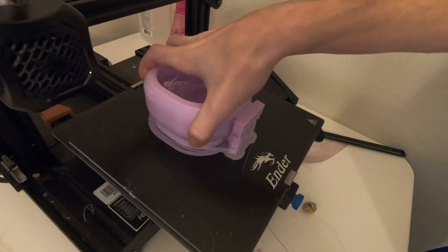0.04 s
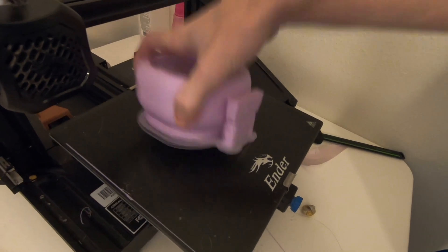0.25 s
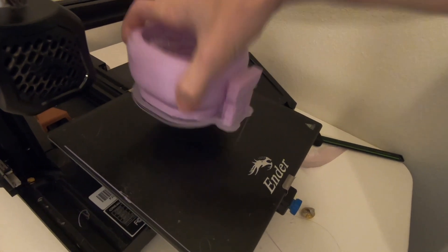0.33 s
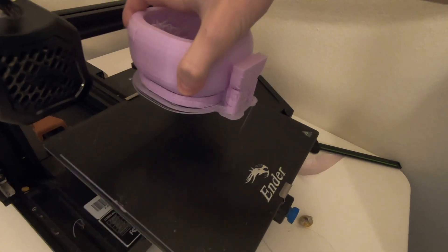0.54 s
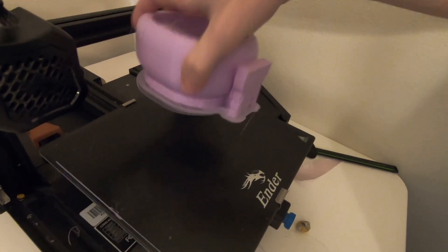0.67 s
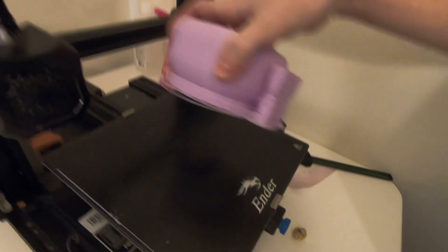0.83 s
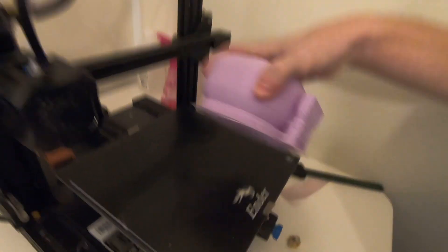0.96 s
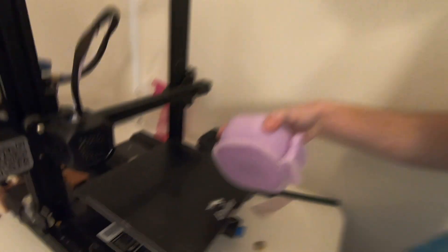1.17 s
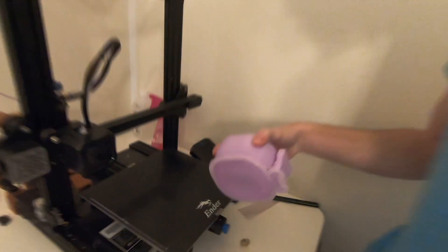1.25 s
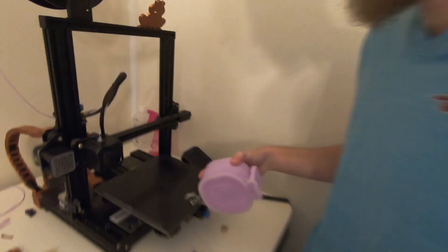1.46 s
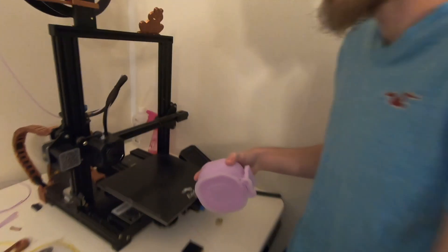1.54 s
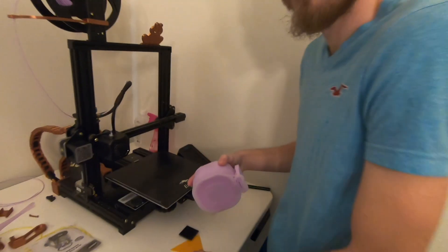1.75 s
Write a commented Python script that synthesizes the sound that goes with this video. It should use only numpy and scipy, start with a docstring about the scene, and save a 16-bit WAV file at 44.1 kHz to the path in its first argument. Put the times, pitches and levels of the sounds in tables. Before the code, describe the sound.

A hollow plastic print cracks loudly off a metal printer bed, then small handling clicks follow

```python
"""First come the quiet air and low drone of a small room, a faint rub and a tiny tick. Then a hollow plastic
print is pried off a printer bed: a faint swell of noise leads into one loud tearing crack that rings the bed
plate. The print is lifted and turned in the hand, with rubs, ticks, a faint squeak and a last sharp click, while
the hand-held microphone rumbles. Crack, rubs and rumble are shaped noise; plate, frame and squeak are sine waves;
ticks mix a noise snap with a ringing sine. Filtered noise that dies away adds the room's answer."""
import sys
import numpy as np
from scipy import signal
from scipy.fft import rfft, irfft, next_fast_len
from scipy.io import wavfile
from scipy.ndimage import map_coordinates

SR = 44100
rng = np.random.default_rng(int(sys.argv[2]) if len(sys.argv) > 2 else 0)


def transcribe(signal):
    """Save signal, clipped to [-1, 1], as a 16-bit WAV file at the path in sys.argv[1]."""
    frames = np.atleast_2d(signal).T
    limited = np.clip(frames, -1, 1)
    pcm = np.round(limited * 32767).astype(np.int16)
    wavfile.write(sys.argv[1], SR, pcm)


N = 79380  # samples
T = np.arange(N) / SR  # time of each sample [s]

# Steady air of the room, and its low drone: (frequency [Hz], relative level [dB])
AIR_COLOUR = [(120, -28.5), (200, -1.5), (456, -20), (735, -11), (1040, -21), (1270, -21.5), (3370, -30.5),
              (5840, -29), (9580, -34.5), (16000, -50)]
DRONE_COLOUR = [(25, -3), (60, -0.5), (85, -12.5), (120, 1.5), (165, -1.5), (230, -12.5), (400, -25.5),
                (1200, -80)]
AIR_DB, DRONE_DB = -74, -68

# How long the room answers: (frequency [Hz], time to fall by 60 dB [s])
ROOM_DECAY = [(150, .3), (400, 0.3), (1000, 0.34), (1700, 0.42), (2900, .41), (5500, 0.46), (8000, 0.4),
              (12000, 0.22), (16000, .22)]
# Tone of the room's answer: (frequency [Hz], level [dB])
ROOM_COLOUR = [(100, -0.5), (260, 8.5), (600, -5.5), (1000, -6), (1700, 0), (3000, -3), (7000, -10),
               (10000, -5.5), (16000, -6.5)]
ROOM_DELAY_S, ROOM_ALIKE = .004, .2  # ALIKE: likeness of left and right, from 0 to 1
EARLY_DB, EARLY_T60_S = -2, .027  # the short answer of near surfaces
ROOM_MONO_HZ = 700  # well below this, left and right hear the same room

# Deep handling rumble, before its overall gain: (time [s], level [dB])
RUMBLE_LEVEL = [(0.0, -78), (0.204, -76), (0.25, -53), (0.31, -45.5), (0.436, -95.5), (0.536, -63),
                (0.776, -62.5), (0.892, -43), (1.016, -42), (1.052, -54.5), (1.112, -43), (1.162, -60),
                (1.318, -45.5), (1.362, -57), (1.558, -54), (1.658, -74), (1.724, -54.5), (1.8, -69)]
# Low shuffling, before its overall gain: (time [s], level [dB])
SHUFFLE_LEVEL = [(0.0, -63.5), (0.184, -89), (0.22, -46.5), (0.254, -52), (0.41, -75), (0.772, -68),
                 (0.806, -57.5), (0.846, -68), (0.872, -53), (1.076, -69), (1.128, -55.5), (1.252, -51.5),
                 (1.272, -64), (1.554, -63.5), (1.654, -58.5), (1.8, -72.5)]
# Hand bumps on the microphone, before the bump strength: (time [s], level [dB])
BUMPS = [(.872, -43.5), (0.931, -46.5), (1.095, -50.5), (1.296, -51), (1.49, -54.5)]
# Tones of the three: (frequency [Hz], relative level [dB])
RUMBLE_COLOUR = [(15, -7.5), (30, 1.5), (60, -7), (95, -22), (160, -32.5), (500, -91)]
SHUFFLE_COLOUR = [(50, -29), (105, -19), (160, 4.5), (205, -0.5), (290, -10.5), (420, -19), (900, -43),
                  (2500, -78.5)]
BUMP_COLOUR = [(25, 16), (90, 13), (250, -3), (700, -40), (2000, -63)]
RUMBLE_GAIN_DB, SHUFFLE_GAIN_DB, RUMBLE_PAN_DB = 1, -1, -4.5  # PAN: left minus right
BUMP_STRENGTH = np.sqrt(.019 * SR)  # a one-sample click made as strong as 19 ms of noise

# Thin wavering tone: (time [s], frequency [Hz], level [dB])
SQUEAK = [(.62, 6600, -101), (.655, 6950, -78), (.69, 7050, -98), (.735, 6650, -78), (.775, 6595, -90),
          (.82, 6720, -87), (.86, 6780, -109)]

# Rubs of plastic: (time [s], level [dB], length [s], time to fall by 60 dB [s],
#                   centre [Hz], distance from the centre to the -6 dB point [octaves])
RUBS = [(0, -68, .03, .2, 5100, 0.56), (1.2496, -56.5, 0.0065, 0.16, 3056, 2.1),
        (1.28, -50, 0.013, 0.28, 1900, 0.66), (1.294, -58.5, 0.02, 0.38, 1070, 0.51),
        (1.558, -53.5, 0.023, 0.2, 1220, 0.58), (1.44, -71, 0.15, 0.19, 3050, 1.13)]
# Resonances of the hollow print, before halving: (frequency [Hz], width [Hz], level [dB])
SHELL = [(1320, 30, 16.5), (1780, 40, 12), (2041, 70, 12.5), (2890, 80, 9.5), (5700, 460, 0)]
RUB_GRAIN_DB, RUB_ROOM_DB = -6, -4
RUB_SKIRT_DB, RUB_TOP_HZ = -18.5, 8200  # SKIRT: level far from the centre of the band

# Ticks of handled plastic: (time [s], level [dB], left minus right [dB], ring frequency [Hz],
#     ring level before doubling [dB], ring time to fall by 60 dB [s], tilt [dB per octave], room level [dB])
TICKS = [(0.048, -58.5, 13, 3200, -8.5, 0.015, 9, -6.5), (0.547, -50, 1.5, 2200, -8, 0.062, -0.5, -7),
         (0.743, -64, 0, 1780, 0, 0.013, -7.5, -4), (1.085, -62.5, -1, 1300, -15, .012, -3, 5),
         (1.4445, -45, -1.5, 2600, 12, 0.0063, -4.5, -0.5), (1.4674, -44.5, -1, 3055, 2, 0.013, -1, -2),
         (1.6109, -24, -4.5, 2740, -15, 0.014, 1.5, -1.5)]
# Tone of a tick before its tilt: (frequency [Hz], relative level [dB])
TICK_COLOUR = [(120, -32), (200, -9), (1000, -7), (2000, -2), (2900, -2), (4400, -9), (6000, -1.5),
               (7400, 1.5), (10000, -7.5), (13600, -19.5), (15500, -25)]
TICK_HOLD_S, TICK_T60_S, TICK_ALIKE = .0014, .0042, .13
TICK_ROOM_TILT_DB = -1.25  # per octave: less of the treble reaches the walls

# Ringing modes of the bed plate: (frequency [Hz], level [dB], time to fall by 60 dB [s])
PLATE = [(395, -34.5, .29), (553, -49, 0.23), (959, -36, .27), (1470, -40.5, .35), (1826, -40, 0.54),
         (2303, -27.5, 0.3), (2291, -36, .35), (2614, -32, .3), (2944, -45, 0.14), (3200, -39.5, 0.56),
         (3350, -35.5, .27), (5104, -37, .33), (6233, -40.5, .33), (8310, -37, 0.38)]
# Slow modes of the frame under it: (frequency [Hz], level [dB], time to fall by 60 dB [s])
FRAME = [(52, -43, .45), (142.2, -31.5, 0.2), (226.2, -33, 0.26), (272, -41, .3)]
# The plate's many weaker modes: (frequency [Hz], typical level of each [dB])
SHIMMER = [(750, -59), (1500, -57.5), (2500, -49.5), (4000, -50), (6500, -48), (9000, -51), (12000, -56.5),
           (15000, -67)]
RELEASE_S = .219  # the bed springs free
PLATE_RISE_S, FRAME_RISE_S, FRAME_LAG_S = .0088, .014, .0065  # RISE: time constant of the build-up
SHIMMER_T60_S, SHIMMER_FALL = .55, .15  # time to fall by 60 dB at 3 kHz; how much it shortens with pitch
SHIMMER_SCATTER_DB, SHIMMER_PAN_DB = 1, 3

# Swell and tearing bursts of the crack: (time [s], starting level [dB], hold time [s],
#     growth during the hold [dB], time to fall by 60 dB [s], treble tilt [dB per octave])
CRACKS = [(0.1958, -55.5, .009, 6, .02, -0.5), (.208, -41.5, .010, 4.5, .012, -1),
          (0.2187, -15.5, .0012, 1.5, 0.0073, 3), (0.2189, -17.5, .0135, 0, .018, 0),
          (0.264, -31.5, 0.0071, 2, .015, -3)]
# Tone of these bursts before their tilt: (frequency [Hz], relative level [dB])
CRACK_COLOUR = [(180, -55), (300, -12), (562, -31), (922, -6), (1540, -14.5), (2560, -1), (3230, -2),
                (3630, -6.5), (4490, -7), (4800, -12.5), (5210, -2.5), (7620, -11.5), (8560, -8.5),
                (12300, -27.5), (15500, -46.5)]
# Sideways lean of these bursts: (frequency [Hz], left minus right [dB])
CRACK_BALANCE = [(300, 1.5), (600, -0.5), (1000, 6), (2000, 4), (2800, 1), (4500, 9.5), (8000, 8.5),
                 (13000, 16)]
CRACK_ALIKE, CRACK_ROOM_DB = .45, -1.5

LIMIT, TOP_HZ = .55, 16300  # highest peak (full scale is 1) and band limit of the recorder


def amp(db):
    """Turn decibels into gain."""
    return 10 ** (np.asarray(db) / 20)


def unit(x):
    """Scale to an rms (average strength) of 1."""
    return x / np.sqrt(np.mean(x ** 2) + 1e-20)


def along(points, hz):
    """Read a curve of (frequency, value) points on a log frequency axis."""
    f, v = np.transpose(points)
    return np.interp(np.log(hz + 1), np.log(f + 1), v)


def curves(rows):
    """Draw straight lines through each column after the time, one value per sample."""
    s, *columns = np.transpose(rows)
    return [np.interp(T, s, column) for column in columns]


def pan(db):
    """Left and right gains for a level difference, left minus right."""
    return amp(np.array([[db], [-db]]) / 2)


def noise(alike):
    """Two white noises, left and right, with the given correlation."""
    a, b = rng.standard_normal((2, N))
    angle = np.arccos(np.clip(alike, -1, 1)) / 2
    shared, apart = np.cos(angle) * a, np.sin(angle) * b
    return np.array([shared + apart, shared - apart])


def impulse(s):
    """One ideal click, a single sample long."""
    return signal.unit_impulse(N, int(np.clip(s * SR, 0, N - 1)))


def colour(x, points, tilt_db=0):
    """Filter with no sound before its cause; the tilt acts above 700 Hz, and white noise keeps its power."""
    m = 2 * next_fast_len(N)
    hz = np.fft.rfftfreq(m, 1 / SR)
    gain = unit(amp(along(points, hz) + tilt_db * np.log2(np.maximum(hz, 700))))
    # folding the cepstrum (spectrum of the log gain) puts the response after time zero
    cepstrum = irfft(np.log(gain + 1e-6))
    cepstrum[1:m // 2] *= 2
    cepstrum[m // 2 + 1:] = 0
    return irfft(rfft(x, m) * np.exp(rfft(cepstrum)))[..., :N]


def burst(s, hold_s, t60):
    """Loudness shape: sudden start, hold, then a fall by 60 dB in each t60."""
    return (T >= s) * amp(-60 * np.maximum(T - s - hold_s, 0) / t60)


def grain(depth_db, rate):
    """Smooth random gain of rms 1, with a new random value rate times a second."""
    wander = map_coordinates(rng.standard_normal(N), [T * rate])
    return unit(amp(depth_db * wander))


def ring(s, hz, t60, rise_s):
    """One struck mode: a fading sine, a little out of phase between left and right."""
    t = np.maximum(T - s, 0)
    phase = rng.uniform(0, 2 * np.pi) + rng.normal(0, .25, (2, 1))
    return np.sin(2 * np.pi * hz * t + phase) * burst(s, 0, t60) * (1 - np.exp(-t / rise_s))


def air():
    """The quiet air and low drone of the room are two steady filtered noises."""
    quiet_air = amp(AIR_DB) * colour(noise(.5), AIR_COLOUR)
    drone = amp(DRONE_DB) * colour(noise(.8), DRONE_COLOUR)
    return quiet_air + drone


def fade(t, t60):
    """Falling power whose sum over time is 1; 60 dB takes t60."""
    power = amp(-120 * t / t60)
    return power / power.sum(-1, keepdims=True)


def room(x):
    """The diffuse answer to a sound: near surfaces die quickly, the room more slowly, as smeared noise."""
    hz, t, z = signal.stft(x, SR, nperseg=128)
    power = np.mean(np.abs(z) ** 2, axis=0)
    answer = fade(t, along(ROOM_DECAY, hz)[:, None]) + amp(EARLY_DB) ** 2 * fade(t, EARLY_T60_S)
    level = np.sqrt(np.abs(signal.fftconvolve(power, answer, axes=1)[:, :len(t)]))
    haze = signal.stft(noise(ROOM_ALIKE), SR, nperseg=128)[2]
    haze /= np.sqrt(np.mean(np.abs(haze) ** 2))
    haze = haze * level * amp(along(ROOM_COLOUR, hz))[:, None]
    tail = signal.istft(haze, SR, nperseg=128)[1]
    # take away the left-right difference in the bass
    low_pass = signal.butter(1, ROOM_MONO_HZ, fs=SR, output="sos")
    bass_side = signal.sosfilt(low_pass, tail[0] - tail[1]) / 2
    tail = tail - [bass_side, -bass_side]
    return np.pad(tail, ((0, 0), (int(ROOM_DELAY_S * SR), 0)))[:, :N]


def handling():
    """The moving microphone rumbles and is bumped; low shuffling noise goes with the movement."""
    rumble_gain = amp(curves(RUMBLE_LEVEL)[0] + RUMBLE_GAIN_DB)
    rumble = rumble_gain * unit(colour(noise(.2), RUMBLE_COLOUR))
    shuffle_gain = amp(curves(SHUFFLE_LEVEL)[0] + SHUFFLE_GAIN_DB)
    shuffle = shuffle_gain * unit(colour(noise(.23), SHUFFLE_COLOUR))
    knocks = sum(amp(db) * impulse(s) for s, db in BUMPS)
    bumps = BUMP_STRENGTH * colour(knocks, BUMP_COLOUR)
    return (rumble + bumps) * pan(RUMBLE_PAN_DB) + shuffle


def squeak():
    """A faint thin tone wavers in pitch and level as the print is lifted."""
    hz, db = curves(SQUEAK)
    sounding = (T > SQUEAK[0][0]) & (T < SQUEAK[-1][0])
    tone = np.sin(2 * np.pi * np.cumsum(hz) / SR)
    return sounding * amp(db) * grain(2, rate=69) * tone


def rubs():
    """Brief grainy slides, each a broad band of noise, ring the hollow print."""
    out = np.zeros((2, N))
    hz = np.geomspace(50, 18000, 900)
    shell = 1 + sum(amp(db) / (1 + (2 * (hz - f) / width) ** 2) for f, width, db in SHELL) / 2
    treble_cut = 1 + (hz / RUB_TOP_HZ) ** 6
    for s, db, length, t60, centre, width in RUBS:
        octaves = np.log2(hz / centre)
        band = (amp(-6 * (octaves / width) ** 2) + amp(RUB_SKIRT_DB)) / treble_cut
        slips = burst(s, length, t60) * noise(.2) * grain(RUB_GRAIN_DB, rate=1200)
        tone = np.column_stack([hz, 20 * np.log10(band * shell)])
        out += amp(db) * colour(slips, tone)
    return out + amp(RUB_ROOM_DB) * room(out)


def ticks():
    """Short plastic contacts: a snap and one damped resonance; the room answers each as a single click."""
    out = np.zeros((2, N))
    for s, db, pan_db, hz, ring_db, t60, tilt, room_db in TICKS:
        contact = burst(s, TICK_HOLD_S, TICK_T60_S)
        snap = colour(contact * noise(TICK_ALIKE), TICK_COLOUR, tilt)
        body = 2 * amp(ring_db) * ring(s, hz, t60, rise_s=.0003)
        # one click with the energy of the whole contact
        click = colour(np.linalg.norm(contact) * impulse(s), TICK_COLOUR, tilt + TICK_ROOM_TILT_DB)
        echo = amp(room_db) * room(click + body / 2)
        out += amp(db) * ((snap + body) * pan(pan_db) + echo)
    return out


def shimmer(count=220):
    """A dense cloud of weaker plate modes; the higher ones die sooner."""
    t = T[:int(.8 * SR)]
    cloud = np.zeros((2, len(t)))
    lowest, highest = SHIMMER[0][0], SHIMMER[-1][0]
    for size, turn, lag in rng.standard_normal((count, 3)):
        hz = lowest + (highest - lowest) * rng.uniform() ** 1.4  # more modes low down
        t60 = SHIMMER_T60_S * (3000 / hz) ** SHIMMER_FALL
        gain = amp(along(SHIMMER, hz) + SHIMMER_SCATTER_DB * size)
        phase = np.pi * turn + np.array([[lag], [-lag]]) * hz / 8000
        cloud += gain * amp(-60 * t / t60) * np.sin(2 * np.pi * hz * t + phase)
    cloud *= 1 - np.exp(-t / PLATE_RISE_S)
    start = int(RELEASE_S * SR)
    return np.pad(cloud, ((0, 0), (start, N)))[:, :N] * pan(SHIMMER_PAN_DB)


def bed():
    """The freed plate starts to ring at once; the heavy frame swings up later and more slowly."""
    plate = sum(amp(db) * ring(RELEASE_S, hz, t60, PLATE_RISE_S) for hz, db, t60 in PLATE)
    frame_start = RELEASE_S + FRAME_LAG_S
    frame = sum(amp(db) * ring(frame_start, hz, t60, FRAME_RISE_S) for hz, db, t60 in FRAME)
    return plate + shimmer() + frame


def cracks():
    """A swell and tearing bursts of noise make up the crack; its treble leans to the left."""
    bursts = np.zeros((2, N))
    for s, db, hold, growth_db, t60, tilt in CRACKS:
        growth = growth_db * np.clip((T - s) / hold, 0, 1)
        strength = amp(db + growth) * burst(s, hold, t60)
        bursts += colour(strength * noise(CRACK_ALIKE), CRACK_COLOUR, tilt)
    lean = along(CRACK_BALANCE, np.fft.rfftfreq(N, 1 / SR)) / 2
    direct = irfft(rfft(bursts) * amp([lean, -lean]), N)
    return direct + amp(CRACK_ROOM_DB) * room(direct)


def scene():
    """Add all the sources, from the background to the crack."""
    return air() + handling() + squeak() + rubs() + ticks() + bed() + cracks()


def record(dry):
    """The recorder rounds off the highest peaks and keeps nothing above its band limit."""
    m = 2 * next_fast_len(N)
    hz = np.fft.rfftfreq(m, 1 / SR)
    rounded = dry / (1 + (dry / LIMIT) ** 6) ** (1 / 6)
    band = np.clip((TOP_HZ - hz) / 600, 0, 1)  # fades out over the last 600 Hz
    return irfft(rfft(rounded, m) * band, m)[:, :N]


dry = scene()
out = record(dry)
transcribe(out)
```